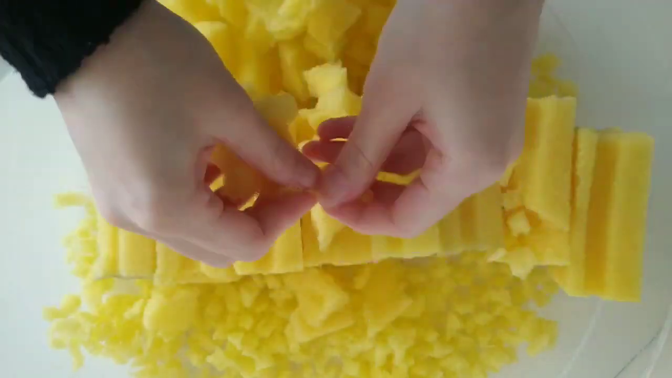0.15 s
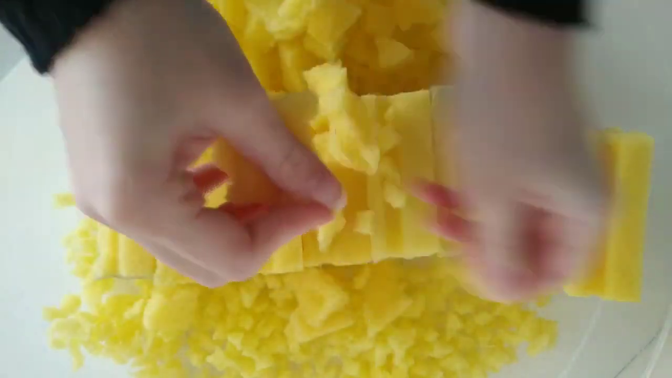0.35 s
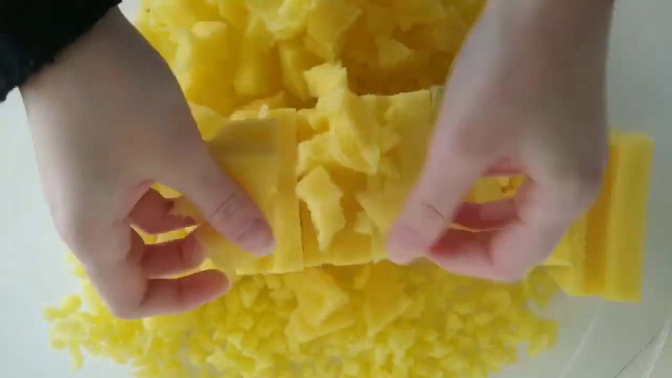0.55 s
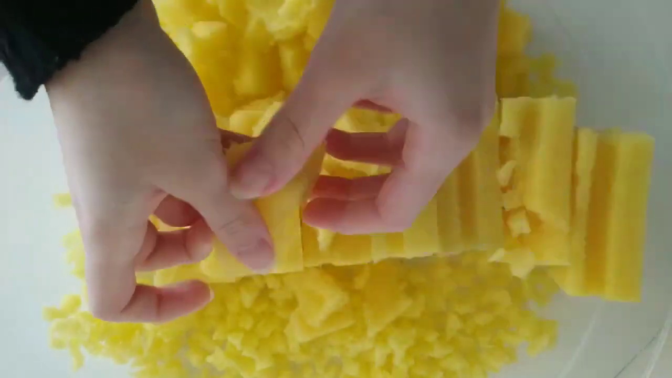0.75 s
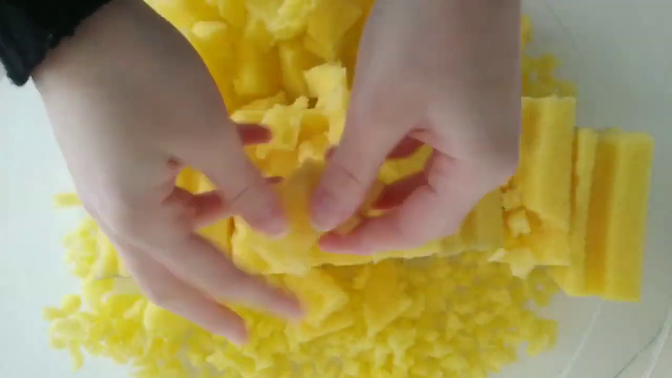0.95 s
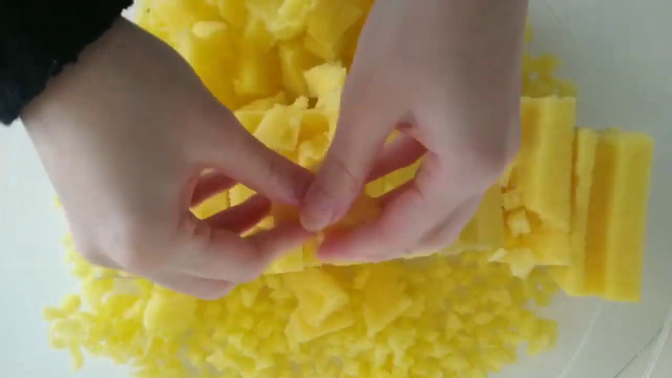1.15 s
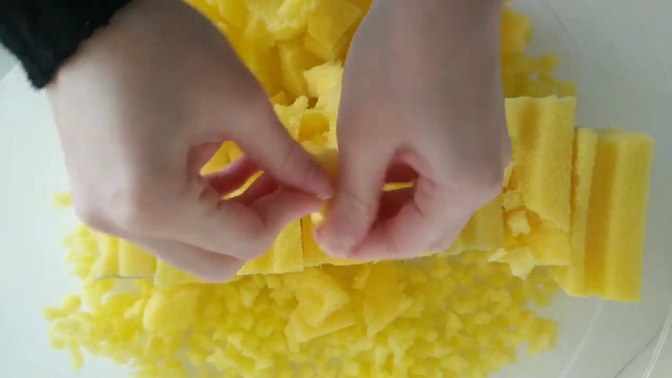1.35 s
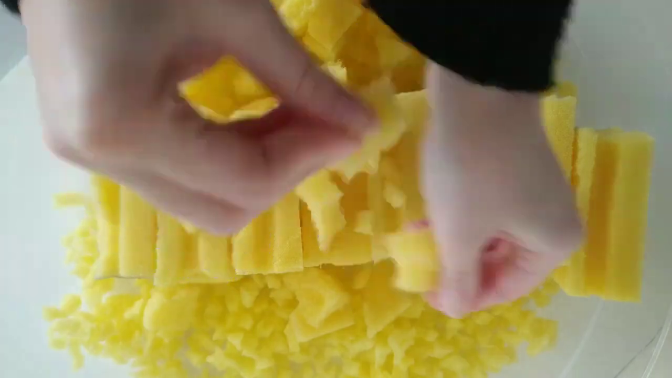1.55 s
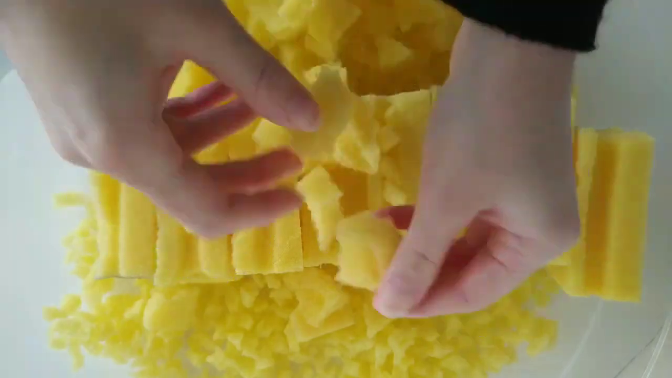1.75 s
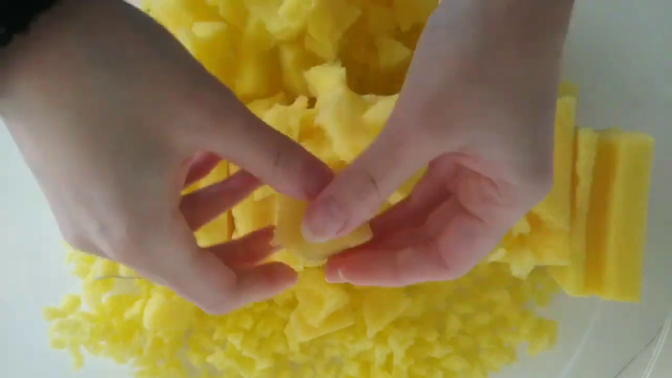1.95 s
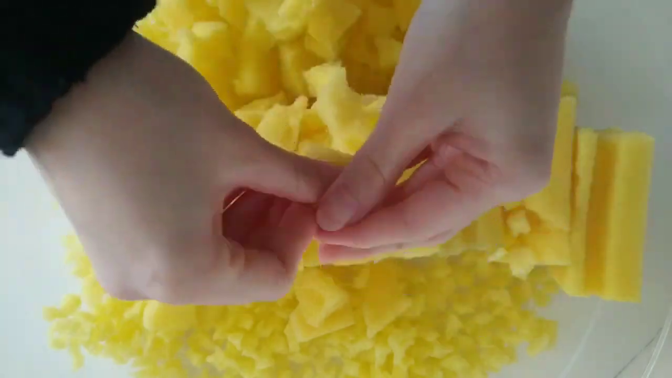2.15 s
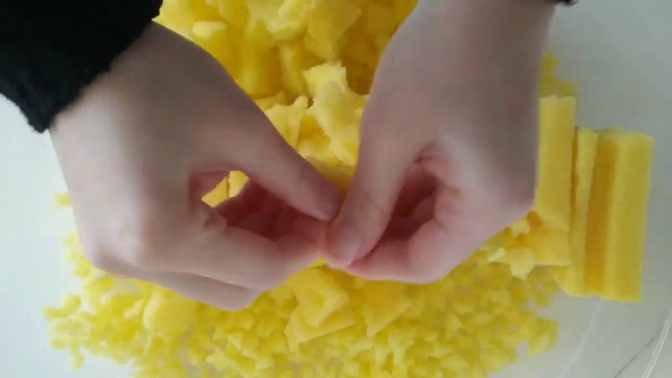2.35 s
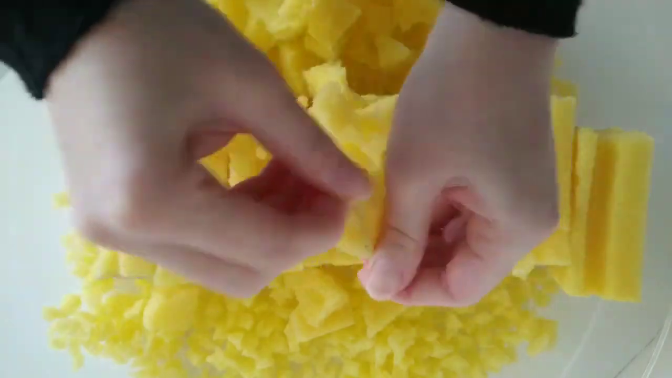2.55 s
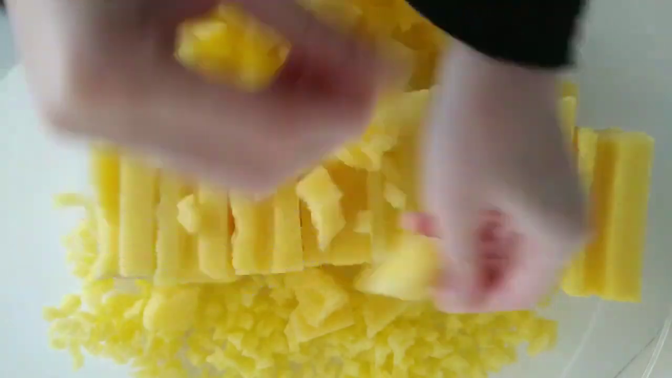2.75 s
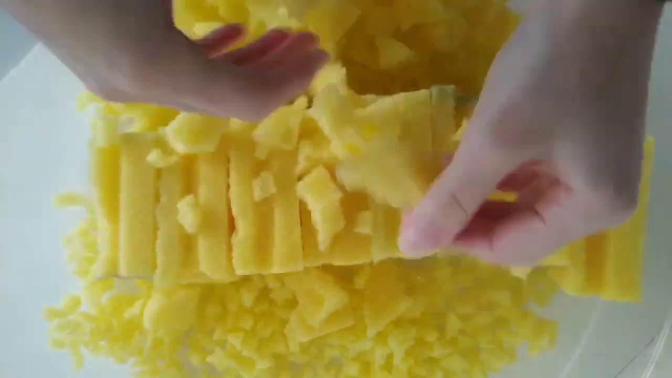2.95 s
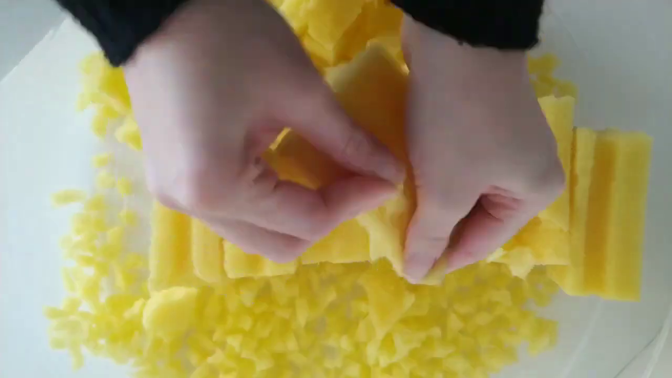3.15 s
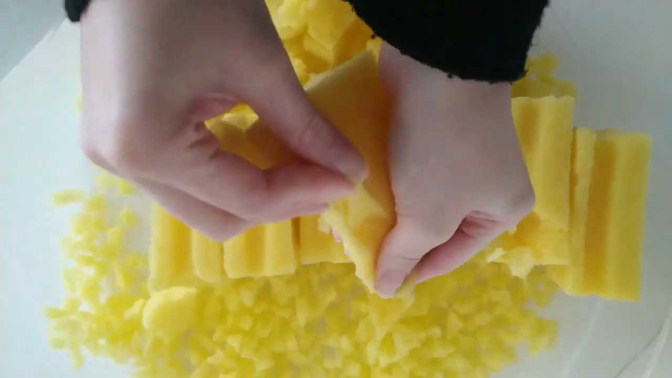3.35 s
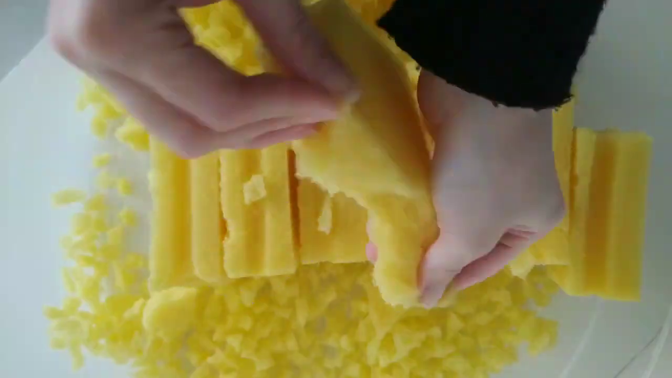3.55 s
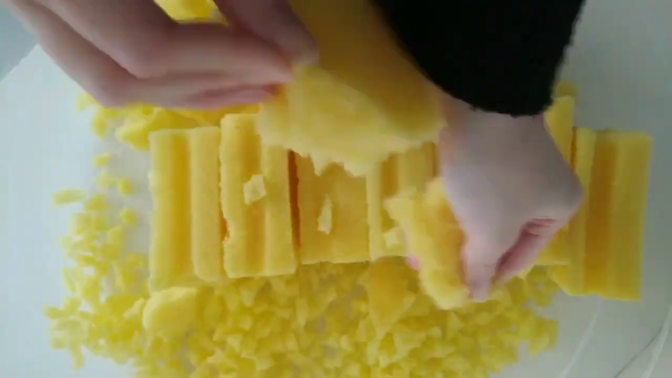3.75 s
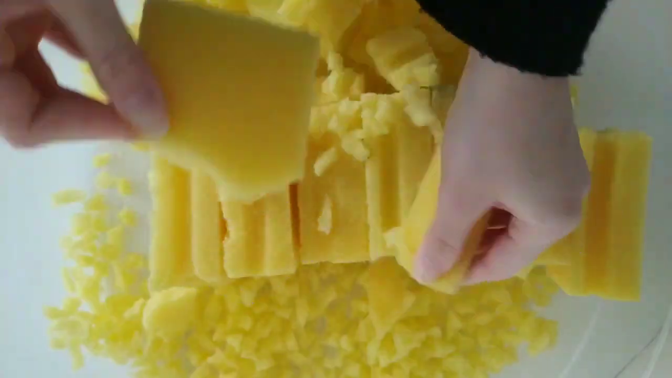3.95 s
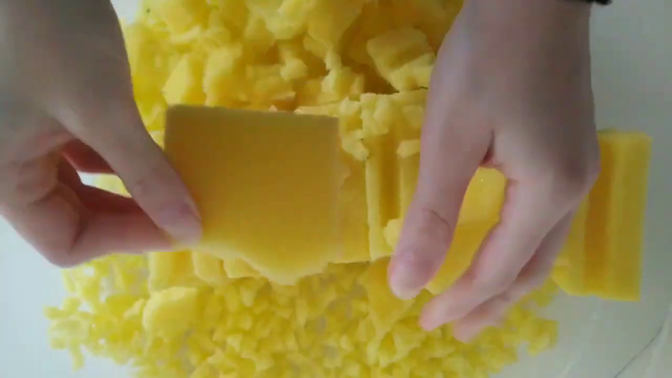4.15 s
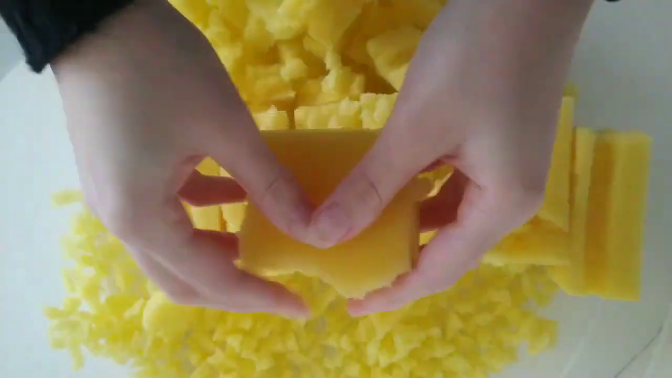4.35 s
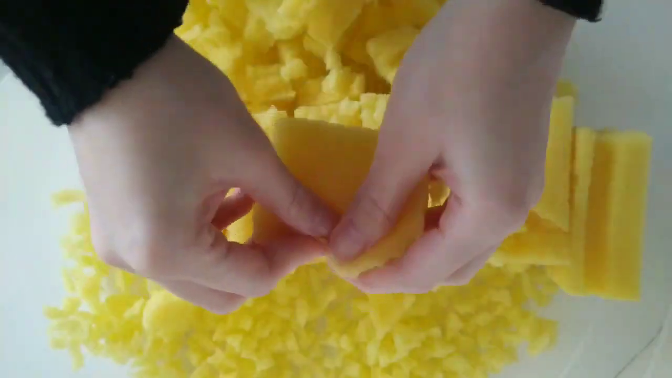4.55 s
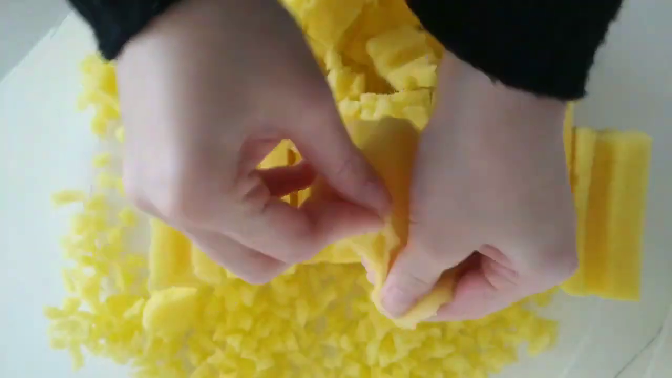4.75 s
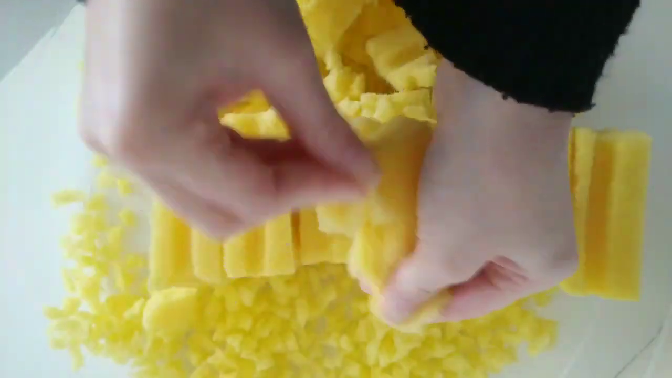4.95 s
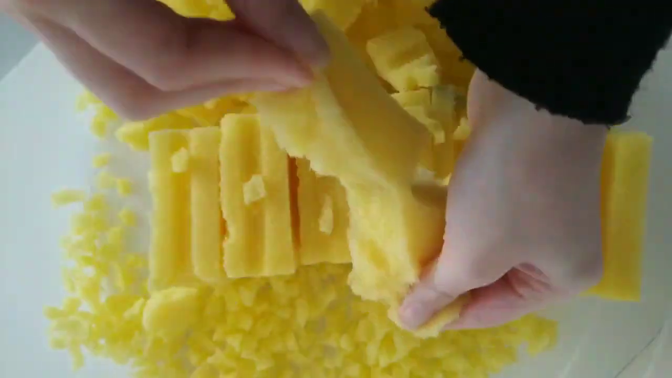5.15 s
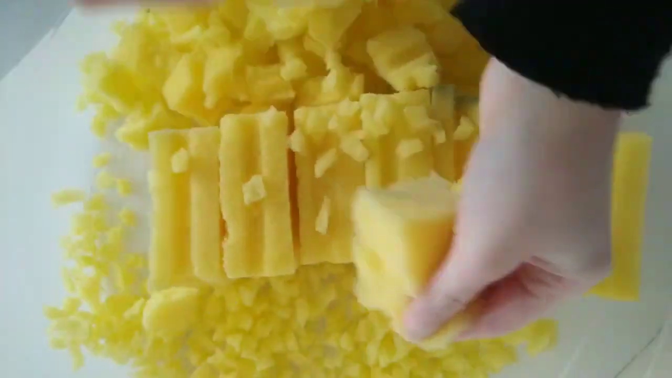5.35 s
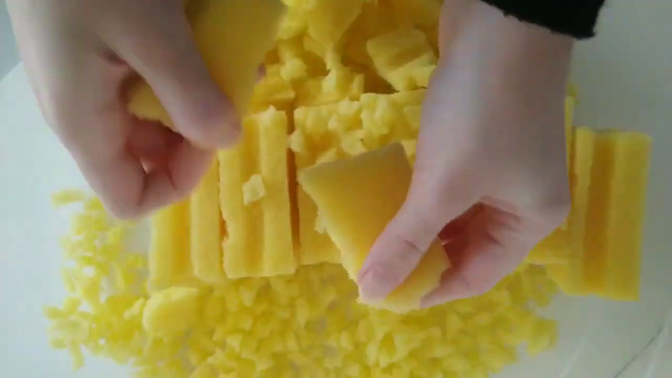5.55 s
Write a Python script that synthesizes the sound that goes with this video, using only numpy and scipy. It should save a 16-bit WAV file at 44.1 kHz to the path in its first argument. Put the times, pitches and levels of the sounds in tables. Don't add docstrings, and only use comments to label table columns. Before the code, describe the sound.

Dry brittle foam is torn by hand up close, crisp crackling rips in short bursts, ending with a loud snapping thump in a quiet room.

```python
import sys
import numpy as np
from scipy import signal
from scipy.fft import rfft, irfft
from scipy.io import wavfile
from scipy.ndimage import uniform_filter1d, map_coordinates

SR = 44100
rng = np.random.default_rng(int(sys.argv[2]) if len(sys.argv) > 2 else 0)


def volts_from_decibels(level):
    exponent = np.asarray(level, float) / 20
    return 10 ** exponent


def to_wav(s):
    ch = np.atleast_2d(s).T
    pcm = np.round(np.clip(ch, -1, 1) * 32767)
    wavfile.write(sys.argv[1], SR, pcm.astype(np.int16))


N = 250488
T = np.arange(N) / SR

# start, strongest moment and end in seconds,
# crackle in dB, wall thickness in dB.
PULLS = [(.347, .408, .424, -33, -1), (1.378, 1.42, 1.47, -48.5, 3), (1.435, 1.457, 1.57, -39, 1),
         (1.47, 1.55, 1.62, -40, -1), (1.572, 1.597, 1.62, -30, 5), (2.488, 2.498, 2.58, -39, -1),
         (2.49, 2.535, 2.595, -36, -1), (2.68, 2.698, 2.77, -44, -1), (2.7, 2.768, 2.787, -32, 3),
         (3.11, 3.16, 3.21, -41, -6), (3.15, 3.21, 3.275, -30, 1), (3.23, 3.265, 3.29, -47, -2),
         (3.335, 3.37, 3.44, -39, 3), (3.36, 3.44, 3.55, -33.5, 2), (3.482, 3.51, 3.61, -27, 1),
         (3.51, 3.575, 3.623, -29, 0), (3.72, 3.743, 3.82, -31, -1), (3.785, 3.803, 3.834, -22.5, 0),
         (4.76, 4.778, 4.83, -39, -2), (4.77, 4.815, 4.895, -33, -1), (4.908, 4.95, 5.05, -41.5, -1),
         (4.965, 5.085, 5.152, -26, 0), (5.233, 5.243, 5.275, -39, 0), (5.25, 5.277, 5.311, -31, 1)]
# level in dB re crackle at the usual pull,
# further dB per dB of pull, dB per dB of thickness.
COARSE_LAW = (-12, .45, 1.01)
BODY_LAW = (-8, .35, 1.1)
FIZZ_LAW = (-3, -.3, -.9)
# start in seconds, fine peak in dB, coarse level in dB re peak.
SPURTS = [(0.3515, -36, -24), (0.367, -26, -20), (0.4114, -19, -19), (1.3862, -29, -24), (1.5948, -17, -22),
          (2.423, -46, -17), (2.438, -40, -22), (2.4735, -32, -13), (2.4925, -26, -26), (2.6865, -37, -22),
          (2.695, -25, -23), (2.7437, -23.5, -11), (3.123, -33, -24), (3.1346, -29, -29), (3.276, -32, -19),
          (3.328, -31, -18), (3.3578, -23, -28), (3.412, -19, -18), (3.683, -29, -23), (3.698, -28, -21),
          (3.73, -23, -20), (3.806, -17, 0), (3.82, -18, -5), (4.474, -35, -22), (4.748, -35, -14),
          (4.889, -26, -20), (5.241, -23, -15), (5.262, -20, 2), (5.2884, -10, 11.5), (5.4545, -41, -6)]
# strongest moment in seconds, rustle in dB,
# seconds per 10 dB of rise, seconds per 10 dB of fall.
TOUCHES = [(.035, -58.5, .04, .04), (.09, -59, .02, .015), (.214, -57, .05, .055), (.34, -63, .04, .02),
           (.555, -58.5, .03, .06), (.835, -59, .012, .1), (1.02, -62, .08, .08), (1.1, -64, .015, .02),
           (1.212, -58.5, .03, .035), (1.33, -66, .05, .05), (1.811, -61, .04, .03), (1.9, -67, .05, .1),
           (2.054, -63, .03, .02), (2.24, -66, .15, .05), (2.48, -57.5, .12, .02), (2.975, -60, .02, .02),
           (3.04, -62.5, .04, .3), (3.707, -50, .012, .006), (3.88, -53.5, .04, .12),
           (4.085, -54, .05, .04), (4.12, -47, .02, .005), (4.17, -66, .02, .1), (4.4, -54.5, .035, .04),
           (4.5, -55, .025, .02), (4.59, -59, .05, .05), (4.72, -64, .1, .05), (5.33, -56, .02, .2),
           (5.651, -53.5, .025, .03)]
# pitch in Hz, pitch over bandwidth (no unit).
CELL_SHARPNESS = [(1500, 8.5), (16000, 4)]
# frequency in Hz, level in dB.
SCRAP_COLOUR = [(880, -34), (1500, -13.5), (3520, -3.5), (4580, -12.5), (5520, -1), (7700, -6), (9560, 0),
                (10600, -2), (15600, -1.5)]
BLOCK_COLOUR = [(880, -37), (1500, -19.5), (1810, -5.5), (2050, -9.5), (5110, -4), (5630, -3.5),
                (8090, -3.5), (8840, -1), (15600, -4.5)]
# start in seconds, table lag in ms,
# table strength 0-1, strength 0-1 of each echo off the hands.
REFLECTIONS = [
    (0, 0.32, .4, 0.34),
    (1.3, 0.35, 0, 0.23),
    (2.4, 0.24, 0.6, 0.16),
    (2.65, 0.34, 0.23, 0.1),
    (2.95, .57, 0.45, 0.33),
    (3.32, 0.51, .25, 0.26),
    (3.7, 0.58, 0.14, 0.07),
    (4.6, 0.705, .2, 0.14),
    (4.92, .56, 0.13, 0.2),
    (5.2, 0.68, 0.16, 0.1),
]
# start in seconds, peak in dB,
# pitch in Hz (minus if it starts as a push), t60 in seconds.
THUDS = [(0.093, -41.5, 140, .06), (.412, -24, 563, 0.011), (1.595, -26, 496, .03),
         (1.604, -23.5, 399, 0.032), (1.608, -26.5, 249, 0.035), (2.747, -22.5, 490, 0.023),
         (2.768, -24, 530, 0.016), (2.787, -43, 92, 0.054), (3.505, -32, 630, 0.033),
         (3.806, -25, 553, .04), (3.82, -17.5, 560, 0.023), (3.8201, -16, 1348, 0.0075),
         (3.8189, -4.5, -195, 0.019), (4.373, -32, 110, 0.033), (5.291, -2, 272.5, 0.018),
         (5.082, -29, 300, .04), (5.103, -27, 260, .035), (2.762, -36, 230, .07), (3.5, -32, 240, .05),
         (5.449, -38, 220, 0.05)]
# start in seconds, peak in dB, pitch in Hz, t60 in seconds.
POPS = [
    (3.731, -30.5, 4820, 0.0068),
    (3.742, -33, 2580, .015),
    (3.742, -36, 1840, 0.018),
    (3.755, -21, 4830, 0.0047),
    (3.8, -27, 3630, 0.01),
    (5.288, -18.5, 3380, 0.0094),
    (5.2894, -19, 4750, 0.0053),
    (5.456, -46, 4000, .012),
]
# start in seconds, length in seconds, pitch in Hz, level in dB.
SQUEAKS = [
    (3.196, 0.034, 1925, -37),
    (3.492, 0.12, 1834, -35),
    (3.52, 0.055, 3540, -44),
    (3.811, 0.015, 1773, -21.5),
    (4.373, 0.043, 3350, -53),
    (5.057, 0.11, 1776, -48),
]
# frequency in Hz, t60 in seconds.
ROOM_DECAY = [(60, 0.68), (250, 0.42), (600, 0.45), (2000, 0.049), (16000, 0.043)]
# frequency in Hz, level in dB, t60 in seconds.
ROOM_MODES = [(126, -5, 0.23), (181.5, -12, 0.39), (236.7, -3, 0.42), (275, -7.5, 0.33), (323.6, -5, 0.068),
              (550, -6, 0.13)]
# frequency in Hz, level in dB per Hz.
HUM_COLOUR = [(15, -45), (33, -19), (70, -18.5), (127, -0.5), (196, -4.5), (225, 2), (251, -5.5), (303, -4),
              (508, -19), (631, -12), (723, -23.5), (898, -24.5), (3040, -28.5), (14700, -35), (16400, -26)]
# frequency in Hz, share 0-1.
NOISE_SHARE = [(4000, 0), (4300, .08), (5200, 0.03), (10000, 0.04), (11500, 0.3), (15800, 0.5)]

SNAPS_PER_S, SNAP_SPREAD_DB, CLUSTER_DB = 1500, 3.0, 1.7
RAREST = .004
BARE_DB = -3.5
BLOCK_FROM_S, FIZZ_HZ = 2.95, 9000
USUAL_PULL_DB, FULL_PULL_DB = -35, -34
BLOCK_FIZZ_DB, UNEVEN_DB = -4, 1.2
SWELL_POWER, LET_GO_POWER, FRAY_POWER = 1.5, 1.9, 1.4
SPURT_S = .0027
SETTLE_DB, SETTLE_S = -25, .045
REST_DB, TOUCH_COARSE_DB, TOUCH_BODY_DB = -73, -2.5, -.8
ROOM_LOW_DB, ROOM_HIGH_DB, BOOM_DB = -15, -24, -59.5
HUM_DB = -54.5
MIC_HZ, MIC_SHARP = 119, 1.65
TOP_HZ = 15830


def unit(x):
    return x / np.sqrt(np.mean(x ** 2))


def colour(x, points):
    hz, db = np.transpose(points)
    f = np.arange(len(x) // 2 + 1) * SR / len(x)
    gain = volts_from_decibels(np.interp(np.log(f + 1), np.log(hz), db))
    return irfft(rfft(x) * gain, len(x))


def band(x, lo_hz, hi_hz):
    sos = signal.butter(2, [lo_hz, hi_hz], "band", fs=SR, output="sos")
    return unit(signal.sosfilt(sos, x))


def walk(rate):
    hold = int(SR / rate)
    steps = np.repeat(rng.standard_normal(N // hold + 1), hold)[:N]
    return unit(uniform_filter1d(steps, hold))


def snaps(per_s, spread_db):
    when, size, sign = rng.random((3, N))
    height = volts_from_decibels(-spread_db * np.log(1 - size + RAREST))
    return (when < per_s / SR) * np.sign(sign - .5) * height


def foam():
    cluster = volts_from_decibels(CLUSTER_DB * walk(250))
    ticks = unit(cells()) + volts_from_decibels(BARE_DB) * unit(snaps(1500, 3.1))
    ticks = np.where(T < BLOCK_FROM_S, unit(colour(ticks, SCRAP_COLOUR)), unit(colour(ticks, BLOCK_COLOUR)))
    fizz = colour(ticks, [(.55 * FIZZ_HZ, -24), (FIZZ_HZ, -6), (1.6 * FIZZ_HZ, 0)])
    fine, fizz = unit(ticks - fizz), unit(fizz)
    coarse = band(snaps(4000, 1.09), 688, 2780)
    body = band(snaps(1500, 2.5), 160, 620)

    crackle, tear_coarse, tear_body, tear_fizz = tears()
    spurt_fine, spurt_coarse = spurts()
    rustle, rub, touch_body = touches(crackle)
    fine_gain = np.sqrt(crackle ** 2 + rustle ** 2 + spurt_fine ** 2)
    coarse_gain = np.sqrt(tear_coarse ** 2 + rub ** 2 + spurt_coarse ** 2)
    touch_fizz = volts_from_decibels(np.where(T < BLOCK_FROM_S, -7.5, -13)) * rustle
    fizz_gain = np.sqrt(tear_fizz ** 2 + touch_fizz ** 2 + (volts_from_decibels(-6) * spurt_fine) ** 2)
    shudder = volts_from_decibels(-4.5) * np.minimum(tear_body, volts_from_decibels(2.5) * crackle) + volts_from_decibels(1.0) * touch_body

    larger = colour(fine, [(3500, 0), (6500, -20)])
    spared = 1 - np.clip((crackle / volts_from_decibels(FULL_PULL_DB)) ** .3, 0, 1)
    fine_part = fine * fine_gain - larger * crackle * spared
    reflected = table(cluster * (fine_part + fizz * fizz_gain))
    return reflected + cluster * coarse * coarse_gain + body * shudder


def cells():
    out = 0
    for hz in 1500 * 2 ** np.arange(0, 3.45, .15):
        sharp = np.interp(hz, *np.transpose(CELL_SHARPNESS))
        b, a = signal.iirpeak(hz, sharp, fs=SR)
        ring = signal.lfilter(b, a, snaps(SNAPS_PER_S, SNAP_SPREAD_DB))
        out = out + unit(ring) * np.sqrt(hz) * volts_from_decibels(2.0 * walk(60))
    return out


def tears():
    power = np.zeros((4, N))
    for start, top, end, db, thick_db in PULLS:
        i = slice(int(start * SR), int(end * SR))
        swell = np.clip((T[i] - start) / (top - start), 0, 1) ** SWELL_POWER
        let_go = np.clip((T[i] - top) / (end - top), 0, 1) ** LET_GO_POWER
        pull = volts_from_decibels(db) * swell * (1 - let_go) ** FRAY_POWER + 1e-9
        power[0, i] += pull ** 2
        for k, (law_db, slope, thick) in enumerate([COARSE_LAW, BODY_LAW, FIZZ_LAW]):
            harder = (pull / volts_from_decibels(USUAL_PULL_DB)) ** slope
            power[k + 1, i] += (pull * volts_from_decibels(law_db + thick * thick_db) * harder) ** 2
    power[1:] *= volts_from_decibels([2 * UNEVEN_DB * walk(40) for _ in range(3)])
    power[3] *= np.where(T < BLOCK_FROM_S, 1, volts_from_decibels(2 * BLOCK_FIZZ_DB))
    return np.sqrt(power)


def spurts():
    out = np.zeros((2, N))
    for s, peak_db, rel_db in SPURTS:
        age = T[T >= s][:SR // 20] - s
        i = int(np.ceil(s * SR))
        level = volts_from_decibels([[peak_db - 12], [peak_db + rel_db - 22]])
        out[:, i:i + len(age)] += level * np.exp(-age / SPURT_S)
    return out


def touches(crackle):
    keep = np.exp(-1 / (SETTLE_S * SR))
    creep = signal.lfilter([1 - keep], [1, -keep], (volts_from_decibels(SETTLE_DB) * crackle) ** 2)
    power = creep + volts_from_decibels(REST_DB) ** 2
    for s, db, before, after in TOUCHES:
        power += volts_from_decibels(db - 10 * np.maximum((s - T) / before, (T - s) / after)) ** 2
    coarse_db = TOUCH_COARSE_DB + 1.5 * walk(15)
    body_db = TOUCH_BODY_DB + 2.1 * walk(15)
    return np.sqrt(power) * volts_from_decibels([0 * T, coarse_db, body_db])


def table(x):
    start, lag_ms, strength, hands = np.transpose(REFLECTIONS)
    k = np.searchsorted(start, T, "right") - 1
    chance = rng.random((len(REFLECTIONS), 5))
    lags_ms = [lag_ms[k] + 0.0049 * walk(40)] + [(0.91 + 3.5 * c)[k] for c in chance.T]
    shares = [strength[k]] + [(-1) ** j * hands[k] for j in range(5)]
    total = x
    for share, lag in zip(shares, lags_ms):
        total = total + share * map_coordinates(x, [np.arange(N) - lag * SR / 1000], order=3)
    return total / np.sqrt(1 + np.sum(np.square(shares), axis=0))


def thuds():
    out = np.zeros(N)
    for s, peak_db, hz, t60 in THUDS + POPS:
        age = np.clip(T - s, 0, 1)
        rise = 1 - np.exp(-age * abs(hz) * 1.2)
        out -= volts_from_decibels(peak_db + 7 - 60 * age / t60) * rise * np.sin(2 * np.pi * hz * age)
    return out


def squeaks():
    out = np.zeros(N)
    for s, length, hz, db in SQUEAKS:
        swell = np.sin(np.pi * np.clip((T - s) / length, 0, 1))
        out += volts_from_decibels(db) * swell * band(snaps(900, 3.5), hz - 45, hz + 45)
    return out


def room(x):
    age, tail = T[:SR // 2], 0
    hz, t60 = np.transpose(ROOM_DECAY)
    for f in 80 * 2. ** np.arange(8):
        part = band(rng.standard_normal(len(age)), f / np.sqrt(2), f * np.sqrt(2)) * np.sqrt(f / SR)
        decay = np.interp(np.log(f), np.log(hz), t60)
        part = part * volts_from_decibels(-60 * age / decay) * np.clip(age / 0.0034 - .5, 0, 1)
        level_db = ROOM_LOW_DB if f < 500 else ROOM_HIGH_DB
        tail = tail + part * volts_from_decibels(level_db - 10 * np.log10(0.026 * SR))
    for f, db, decay in ROOM_MODES:
        mode = np.sin(2 * np.pi * f * age) * np.clip(age / 0.01, 0, 1)
        tail = tail + volts_from_decibels(BOOM_DB + db - 60 * age / decay) * mode
    return signal.fftconvolve(x, tail)[:N]


def hum():
    return unit(colour(rng.standard_normal(N), HUM_COLOUR)) * volts_from_decibels(HUM_DB + 0.27 * walk(5.8))


def microphone(x):
    w = 2 * np.pi * MIC_HZ
    return signal.lfilter(*signal.bilinear([1, 0, 0], [1, w / MIC_SHARP, w * w], SR), x)


def scene():
    near = foam() + thuds() + squeaks()
    heard = microphone(near + room(near))
    return np.tile(heard + hum(), (2, 1))


def low_pass(x):
    return signal.sosfilt(signal.butter(12, 16510, fs=SR, output="sos"), x)


def record(dry):
    hz, _, z = signal.stft(dry, SR, "cosine", nperseg=2048)
    frames = z.shape[-1]
    which = (hz // 690).astype(int)
    luck = uniform_filter1d(rng.standard_normal((which[-1] + 1, frames)), size=3, axis=1)
    luck = np.argsort(np.argsort(luck, axis=1), axis=1) / frames
    swapped = luck[which] < np.interp(hz, *np.transpose(NOISE_SHARE))[:, None]
    loud_db = 20 * np.log10(np.abs(z[0, hz > 4000]).mean(axis=0) + 1e-9)
    swapped &= np.abs(np.gradient(loud_db)) < 7
    noise = volts_from_decibels(2.5) * z * np.exp(2j * np.pi * rng.random(z.shape))
    z = (hz < TOP_HZ)[:, None] * np.where(swapped, noise, z)
    mix = signal.istft(z, SR, "cosine", nperseg=2048)[1][:, :N]
    return low_pass(mix)


dry = scene()
out = record(dry)
to_wav(out)
```